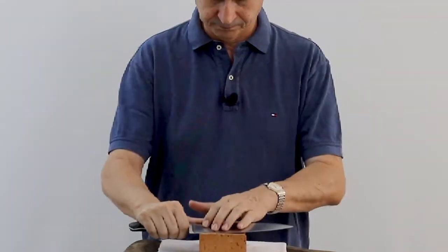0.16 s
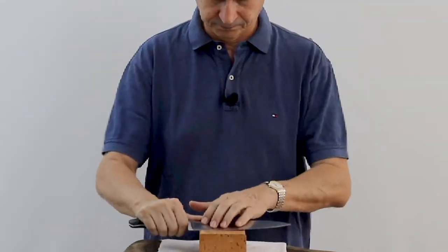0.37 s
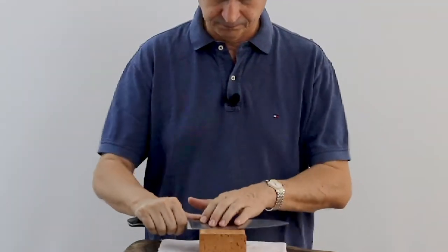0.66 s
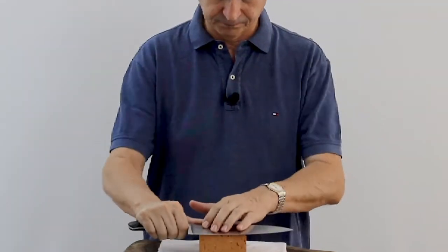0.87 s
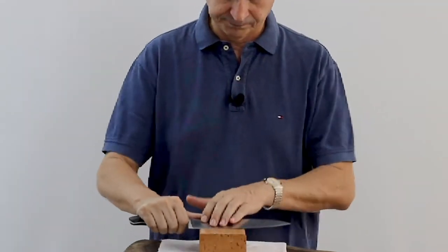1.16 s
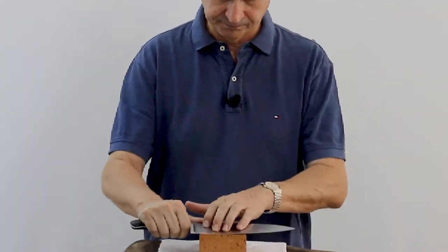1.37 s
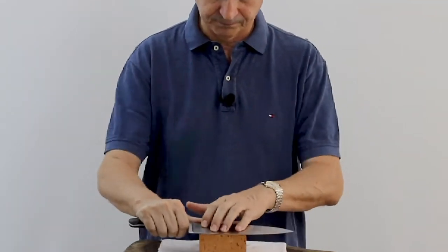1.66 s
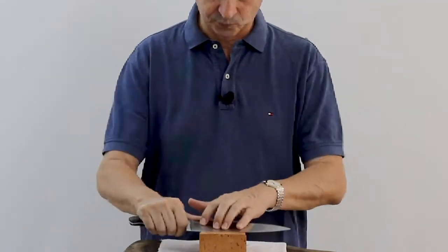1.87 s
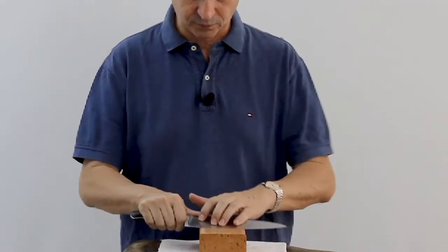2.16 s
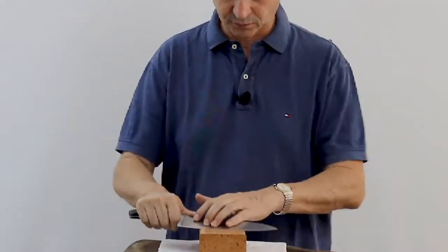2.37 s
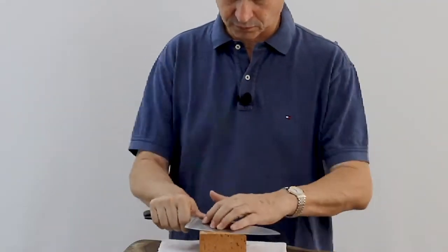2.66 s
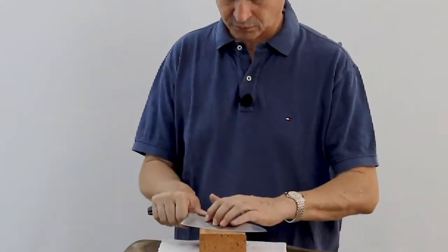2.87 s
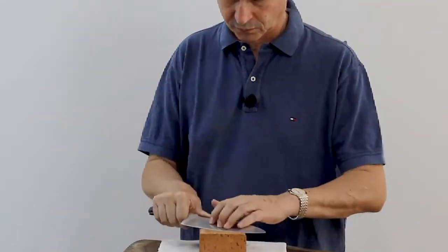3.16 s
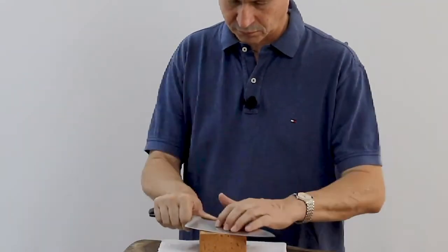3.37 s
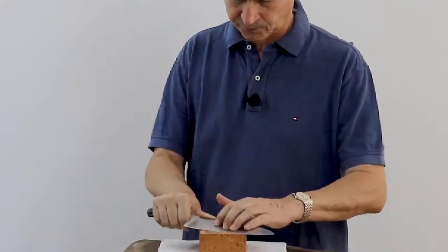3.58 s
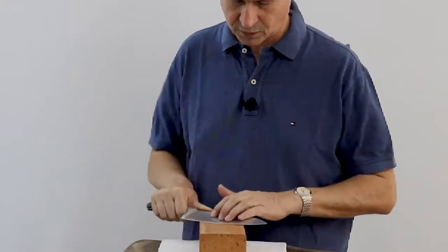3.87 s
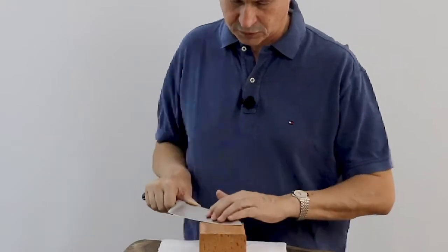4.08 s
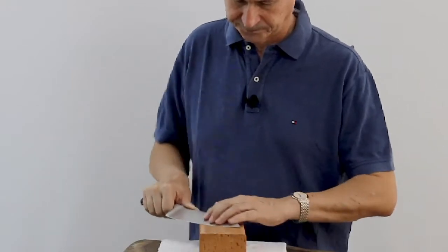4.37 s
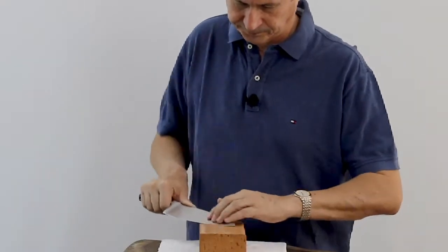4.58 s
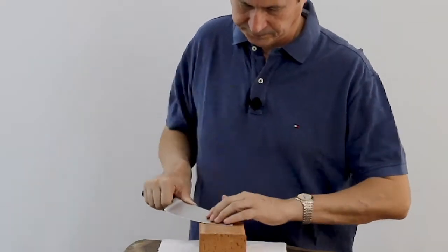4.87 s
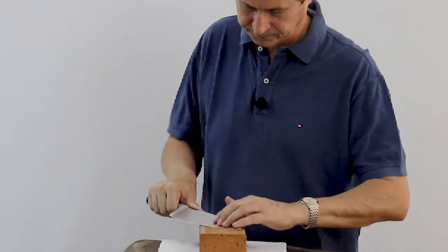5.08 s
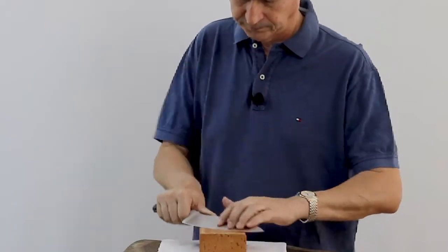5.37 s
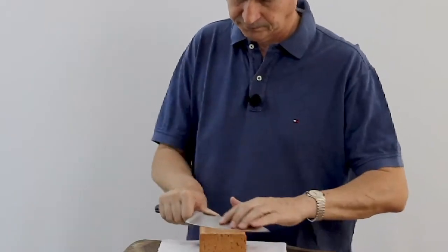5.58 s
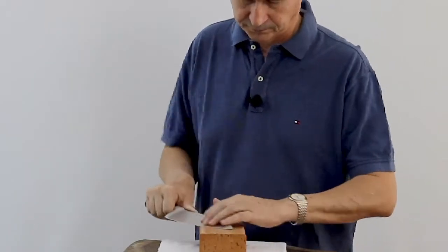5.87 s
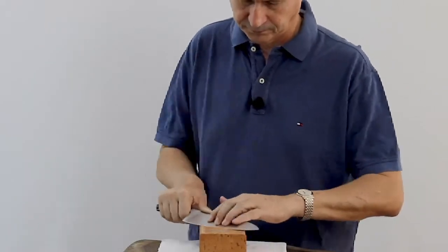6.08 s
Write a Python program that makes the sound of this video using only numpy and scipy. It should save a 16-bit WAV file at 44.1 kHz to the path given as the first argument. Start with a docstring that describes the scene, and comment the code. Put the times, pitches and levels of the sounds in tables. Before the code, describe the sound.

Five heavy, gritty steel scrapes on brick with sharp crackling snaps, then a fluttering rush of fast, softer rasping strokes with a few tiny squeaks.

```python
"""Knife on a wet brick

A steel knife is sharpened on a wet clay brick in a small room, heard from close by over faint air noise and hum.
Five slow, heavy strokes drive the blade's resonances with random grit, while larger grains snap as noise bursts.
Then the same work is heard as if sped up: thin, hissy strokes, about twenty-two a second, in which grit noise
follows the blade's speed and its colour shifts with the hold. A few squeaks (gliding sines) and dull knocks
(filtered noise) join in."""
import sys
import numpy as np
from scipy import signal
from scipy.fft import rfft, irfft, next_fast_len
from scipy.io import wavfile
from scipy.ndimage import map_coordinates

SR = 44100
rng = np.random.default_rng(int(sys.argv[2]) if len(sys.argv) > 2 else 0)


def wav_out(sig):
    """Save sig, one row per channel (or a flat mono array), as 16-bit PCM at SR to the path in sys.argv[1]."""
    wavfile.write(sys.argv[1], SR, np.round(np.clip(np.atleast_2d(sig).T, -1, 1) * 32767).astype(np.int16))


N = 275184
TIME = np.arange(N) / SR
TOP_HZ = 15820  # upper band limit


def amp(db):
    """Level: decibels converted to an amplitude ratio."""
    return 10 ** (np.asarray(db) / 20)


def unit(x):
    """Normalisation: a signal scaled to an rms of 1."""
    return x / np.sqrt(np.mean(x ** 2) + 1e-20)


def add(track, s, sound):
    """Superposition: a sound is summed into a track from time s."""
    start = max(round(s * SR), 0)
    part = track[start:start + len(sound)]
    part += sound[:len(part)]


def wobble(rate, n):
    """Band-limited fluctuation: n samples of a smooth random curve, rate knots a second."""
    knots = rng.standard_normal(n // 8 + 4)
    return map_coordinates(knots, [np.arange(n) * rate / SR], mode="wrap")


def below(hz, edge_hz, order):
    """Low-pass response: gain falls smoothly above the edge."""
    return 1 / np.sqrt(1 + (hz / edge_hz) ** (2 * order))


def above(hz, edge_hz, order):
    """High-pass response: gain falls smoothly below the edge."""
    return below(edge_hz, hz + 1, order)  # + 1 avoids dividing by zero


def coloured(x, gain):
    """Minimum-phase filtering: a given gain over frequency, with ringing only after each grain strikes."""
    size = 2 * next_fast_len(len(x) // 2 + 2048)
    gains = np.maximum(gain(np.fft.rfftfreq(size, 1 / SR)), 1e-6)
    # folding the cepstrum onto positive time makes the filter causal
    cepstrum = irfft(np.log(gains))
    cepstrum[1:size // 2] *= 2
    cepstrum[size // 2 + 1:] = 0
    return irfft(rfft(x, size) * np.exp(rfft(cepstrum)))[:len(x)]


def blade(modes, hz):
    """Modal resonance: summed power of damped peaks; each is 6 dB down one width from its centre."""
    power = 0
    for centre_hz, width_hz, db in modes:
        power = power + (amp(db) / (1 + ((hz - centre_hz) / width_hz) ** 2)) ** 2
    return np.sqrt(power)


def grit(n, size_db, slip_rate, slip_db, slip_t60, rub):
    """Stick-slip friction: unequal grains rub steadily, and slips start at once and die away."""
    grains = rng.standard_normal(n) * amp(size_db * rng.standard_normal(n).clip(-2, 2))
    slips = rng.random(n) < slip_rate / SR
    slip_powers = slips * amp(2 * slip_db * rng.standard_normal(n).clip(-2, 2))
    # slips act on power, so 60 dB of decay is a factor of 1e-6
    power = signal.lfilter([1], [1, -amp(-120 / (slip_t60 * SR))], slip_powers)
    return grains * np.sqrt(rub + power / (power.mean() + 1e-12))


def ringing(x, t60, wet_db):
    """Diffuse decay: a short dense tail of fine steel modes and nearby surfaces."""
    t = np.arange(SR // 4) / SR
    tail = rng.standard_normal(len(t)) * amp(-60 * t / t60)
    return x + amp(wet_db) * signal.fftconvolve(x, tail / np.linalg.norm(tail))[:len(x)]


# Relative spectrum of the background air: frequency_hz, level_db
ROOM_NOISE = [(15, -53), (25, -29), (135, -7.5), (238, 0), (1200, -7), (1560, -28), (2640, -120)]
# Hum components, each sounding at 3 dB above its listed level in rms: pitch_hz, level_db
HUM = [(247.6, -82), (360.7, -85.5), (742.9, -83)]
AIR_DB = -73  # rms


def room():
    """Stationary noise: steady coloured air and a thin hum of phase-wandering sines."""
    points_hz, points_db = np.transpose(ROOM_NOISE)
    air_gain = lambda hz: amp(np.interp(np.log(hz + 1), np.log(points_hz), points_db))
    air = amp(AIR_DB) * unit(coloured(rng.standard_normal(N), air_gain))
    hum = 0
    for hz, db in HUM:
        hum = hum + amp(db + 3) * unit(np.sin(2 * np.pi * hz * TIME + 1.3 * wobble(11, N)))
    return air + hum


# Blade resonances under heavy pressure, in three sets that shift with the grip from stroke to stroke:
# centre_hz, width_hz, level_db
FIRST_GRIP = [(455, 88, -7.5), (772, 34, -10), (1160, 40, -10.5), (1425, 195, -13), (2170, 79, -13.5),
              (2486, 29, -6), (3030, 100, -5), (3960, 155, -11.5), (5010, 180, -10.5), (6600, 400, -9),
              (7656, 120, 1), (8900, 680, -8.5), (10460, 280, -17), (11600, 270, -16.5), (13740, 370, -14),
              (14120.0, 205, -27), (15700, 1200, -23)]
SECOND_GRIP = [(255, 43, -16.5), (439, 70, -8.5), (798, 115, -17), (1184, 63, -10), (1557, 84, -12),
               (2181, 17, -8.5), (2430, 700, -21.5), (3170, 81, -5), (3972, 50, -3), (5110, 530, -12.5),
               (6210, 85, -4.5), (6560, 120.0, -2), (7510, 210, 0.5), (8620, 225, 0), (9710, 210, -8),
               (11100, 280, -10), (12600, 230, -14), (14000, 1500, -14)]
THIRD_GRIP = [(406, 111, -8.5), (806, 38, -6.5), (1200, 250, -18.5), (1605, 68, -3.5), (2626, 170, -3.5),
              (3186, 150, -4), (4030, 300, -14.5), (4870, 110, -5.5), (5190, 110, -6.5), (6390, 480, -8.5),
              (7640, 390, -7), (8700, 540, -8.5), (10170, 220, -14.5), (11350, 610, -18), (12860, 240, -8.5),
              (14100, 910, -13.5)]
# Slow strokes, the last two being relative changes of effort before and after the hardest moment:
# start_s, hardest_s, end_s, growl_db, rasp_db, swell_db, fade_db
GRINDS = [(0.0, 0.043, 0.24, -23, -20.5, -1, 8), (0.291, 0.485, 0.585, -25.5, -20, 8, 14),
          (0.592, 0.651, 0.76, -23, -19.5, 14.5, 8.5), (0.764, 0.801, 0.875, -24.5, -26, 2, 15.5),
          (0.923, 1.055, 1.081, -20, -19, 11.5, 6.5)]
# Resonance set sounding in each slow stroke: modes
GRIND_GRIPS = [FIRST_GRIP, SECOND_GRIP, SECOND_GRIP, THIRD_GRIP, THIRD_GRIP]
# Least effort while the blade still drags between strokes, relative to the hardest moment
DRAG_DB = -16.5


def grinding():
    """Friction-driven resonance: coarse grit excites low modes (growl) and high modes (rasp)."""
    out, t = np.zeros(N), TIME[:SR * 3 // 2]
    turns = [row[0] for row in GRINDS[1:]] + [RUNS[0][0]]
    for stroke, modes, turn in zip(GRINDS, GRIND_GRIPS, turns):
        start, hardest, end, growl_db, rasp_db, swell_db, fade_db = stroke
        force = grit(len(t), size_db=7.5, slip_rate=380, slip_db=-1.0, slip_t60=0.014, rub=1.0)
        steel_gain = lambda hz: blade(modes, hz) * (1.05 - below(hz, 166, order=4))
        steel = coloured(ringing(force, t60=0.06, wet_db=-2.5), steel_gain)
        growl = unit(coloured(steel, lambda hz: below(hz, 3740, order=8)))
        # fine grit comes and goes under the edge
        rasp = coloured(steel, lambda hz: above(hz, 4500, order=8))
        rasp = unit(rasp * amp(1.85 * wobble(90.9, len(t))))
        # the edge bites at once and stays on the brick until the next stroke takes over
        bite = np.clip((t - start) / 0.0023 + 1, 0, 1)
        contact = bite * amp(-60 * np.maximum(t - turn, 0) / 0.044)
        # the arm leans in and eases off; after the stroke only a light drag is left
        effort_db = np.interp(t, [start, hardest, end], [-swell_db, 0, -fade_db])
        effort_db = np.maximum(effort_db - 60 * np.maximum(t - end, 0) / 0.091, DRAG_DB)
        # the arm's push shakes the table faintly, most at the start
        shake = coloured(rng.standard_normal(len(t)), lambda hz: below(hz, 89, order=2))
        rumble = amp(-29.5 - 8.4 * t) * unit(shake)
        # the growl follows the effort slightly more steeply than the rasp
        low = amp(growl_db + 1.094 * effort_db) * (growl + rumble)
        high = amp(rasp_db + 1.06 * effort_db) * rasp
        add(out, 0, contact * (low + high))
    return out


# Large grains that break under the edge: start_s, peak_db
SNAPS = [(0.081, -11), (0.148, -14), (0.4393, -3.5), (0.4813, -7), (0.548, -10), (0.6514, -11.5),
         (0.7685, -6.5), (0.7794, -17), (0.8003, -30), (1.0345, -6.5), (1.0865, -7), (1.103, -9)]


def snaps():
    """Impulsive excitation: a large grain cracks and crumbles within milliseconds, striking the blade."""
    out, t = np.zeros(N), TIME[:SR // 10]
    for s, db in SNAPS:
        decay = amp(-60 * t / 0.0035) + amp(-11.0 - 60 * t / 0.013)  # crack, then crumble
        crack = rng.standard_normal(len(t)) * decay
        modes = SECOND_GRIP if s < GRINDS[3][0] else THIRD_GRIP
        snap_gain = lambda hz: blade(modes, hz) * above(hz, 870, order=1)
        snap = coloured(ringing(crack, t60=0.065, wet_db=2), snap_gain)
        add(out, s, amp(db) * snap / np.abs(snap).max())
    return out


# Runs of evenly spaced quick strokes: start_s, strokes_count
RUNS = [(1.118, 7), (1.426, 4), (1.62, 4), (1.788, 5), (2.056, 4), (2.268, 7), (2.616, 4), (2.823, 9),
        (3.246, 7), (3.603, 8), (3.988, 8), (4.354, 18), (5.113, 14), (5.691, 6), (5.928, 8)]
RUNS_END_S = 6.232
# Pressure on the blade, heard as the level of the quick strokes: time_s, level_db
PRESSURE = [(1.14, -34), (1.29, -35.5), (1.45, -33), (1.75, -38), (2.08, -34), (2.19, -36), (2.55, -35),
            (2.79, -41), (2.9, -45), (2.98, -38.5), (3.2, -37), (3.35, -34), (3.75, -33.5), (3.98, -32.5),
            (4.2, -39.5), (4.54, -41.5), (4.9, -37.5), (5.12, -38), (5.37, -35.5), (5.47, -36.5),
            (5.68, -37.5), (5.9, -45), (6.21, -36.5)]
# Relative weight of the low modes (body) and high modes (sizzle): time_s, body_db, sizzle_db
SCRUB_TONE = [(1.14, 2, -1), (1.9, 1.5, 0), (2.25, 0, -1), (2.6, -1.5, 0.5), (2.86, 5, 1.5),
              (3.04, -8.5, -3), (3.55, 3.5, 0.5), (3.7, -2.5, -2.5), (3.92, 2.5, 4), (4.02, -8, -4),
              (4.2, 2, -2), (4.72, 0, -3.5), (5.25, -0.5, -1), (5.5, -1, 0.5), (5.87, 2, -4),
              (6.17, 1.5, 0.5)]
# Single quick strokes that stand out as stronger, weaker, fuller or thinner:
# time_s, extra_level_db, extra_body_db
ACCENTS = [(2.135, 2.5, 0), (2.44, -0.5, 3), (2.49, 1, -1), (2.64, 2, -2.5), (2.985, 0.5, 3.5),
           (3.175, -2.5, 10.5), (4.2, -3.5, 0), (4.415, 2.5, -1), (4.67, 4, 1.5), (4.925, 2.5, 0),
           (5.3, -2, -1), (5.42, 1.5, 0), (5.46, -3.5, 4.5), (5.67, 3, 0), (5.985, 5.5, -0.5),
           (6.025, -2.5, -2), (6.06, 3.5, 7.5), (6.1, -2, 6), (6.21, 1.5, 3.5)]
# The push starts early, louder and fuller; the pull starts late, softer and thinner, by the same amounts
PUSH_LEAD_S, PUSH_DB, PUSH_BODY_DB = 0.0008, 0.48, 1
# Fastest moment as a share of the stroke, 0-1
PUSH_FASTEST, PULL_FASTEST = 0.38, 0.52
# Standard deviations from stroke to stroke
SCATTER_DB, TONE_SCATTER_DB = 0.6, 0.24


def quick_strokes():
    """Reciprocating motion: yields start s, end s, fastest share, level, body and sizzle dB per stroke."""
    run_s, counts = np.transpose(RUNS)
    number = np.arange(counts.sum() + 1)
    way = (-1) ** number  # +1 push, -1 pull
    first_numbers = np.r_[0, np.cumsum(counts)]
    turns = np.interp(number, first_numbers, np.r_[run_s, RUNS_END_S]) - PUSH_LEAD_S * way
    tone_s, body_curve, sizzle_curve = np.transpose(SCRUB_TONE)
    for start, end, sign in zip(turns, turns[1:], way):
        middle = (start + end) / 2
        db = np.interp(middle, *np.transpose(PRESSURE)) + sign * PUSH_DB
        db += rng.normal() * SCATTER_DB
        body_db = np.interp(middle, tone_s, body_curve) + sign * PUSH_BODY_DB
        body_db -= rng.normal() * TONE_SCATTER_DB
        sizzle_db = np.interp(middle, tone_s, sizzle_curve) - rng.normal() * TONE_SCATTER_DB
        for s, extra_db, extra_body_db in ACCENTS:
            if start <= s < end:
                db, body_db = db + extra_db, body_db + extra_body_db
        yield start, end, PUSH_FASTEST if sign > 0 else PULL_FASTEST, db, body_db, sizzle_db


# Blade resonances in the quick strokes, for each way of holding it: centre_hz, width_hz, level_db
FLAT = [(1690, 140, -17.5), (2560, 555, -2), (4820, 310, 1), (6950, 610, -7), (9840, 470, 8),
        (12800, 690.0, -9)]
PRESSED = [(1700, 195, -17), (2710, 400, -9), (5090, 370, -4.5), (5870, 180, -6), (6920, 300, -7.5),
           (10790, 1010, -1.5)]
TURNED = [(1605, 290, -22.5), (2660, 300, -18), (5210, 450, -11), (5770, 170, -7), (7000, 630, -17),
          (10140, 770, -14.5), (13400, 1400, -21.5)]
TILTED = [(1510, 290, -16.5), (2720, 400, -20), (6270, 930, -9), (6600, 140, 1), (8970, 370, -10.5),
          (10400, 670.0, -12.5), (13100, 790.0, -13.5)]
BELLY = [(1580, 223, -12.5), (2880, 386, -9), (4810, 450, -13), (5840, 430, 2.6), (6670, 270, -1.5),
         (9400, 2300, -14), (10000, 170, -14), (12600, 280, -9)]
TIP = [(1770, 216, -3), (2940, 910, -10.5), (5390, 810, -1.5), (7480, 730, -3), (9000, 290, -6),
       (10570, 1100, -5.5), (13400, 1100, -1)]
ROLLED = [(2260, 340, -9.5), (4780, 540, -11), (5800, 350, -4), (6600, 510, -2), (7660, 230, -1),
          (9640, 860, -2.5), (13100, 1300, -10)]
POINT = [(1830, 370, 2), (2900, 73, -17), (4400, 340, -7), (5340, 310, -0.5), (7700, 330, 6.5),
         (11700, 2500, 5.5)]
# The two highest resonances, whose pitch is the same in every hold: centre_hz, width_hz, level_db
TOP_MODES = [(14700, 62, 3.5), (15250, 290, 1.5)]
# Changes of hold, with the depth of the blade's antiresonance: time_s, modes, notch_db, top_modes_db
HOLDS = [(1.05, FLAT, 4, 6.5), (1.52, PRESSED, 11, -0.5), (2.28, TURNED, 0.5, -7.5),
         (2.9, TILTED, 10, -8.5), (3.25, BELLY, 17, -1.5), (4.08, TIP, 10, 6), (5.23, ROLLED, 18, -5),
         (5.39, BELLY, 14.5, 1.5), (5.692, POINT, 9, -2), (5.964, BELLY, 24, 3.5)]


def hold_colour(s, hz, roll_s):
    """Boundary-dependent modes: gain at time s as the wrist rolls smoothly from one hold to the next."""
    reached = [np.clip((s - hold[0]) / roll_s + .5, 0, 1) for hold in HOLDS[1:]]
    shares = -np.diff([1] + reached + [0])
    gain = 0
    for (_, modes, notch_db, top_db), share in zip(HOLDS, shares):
        if share > 0:
            hollow_db = -notch_db * np.exp(-((hz - 3330) / 350) ** 2)
            steel = np.hypot(blade(modes, hz), amp(top_db) * blade(TOP_MODES, hz))
            gain = gain + share * steel * amp(hollow_db)
    return gain * (above(hz, 1260, order=5) + 0.39)


def scrubbing():
    """Velocity-dependent friction: the rasp swells with the blade's speed and almost stops at every turn."""
    out, t = np.zeros(N), TIME[:SR // 12]
    for s, end, fastest, db, body_db, sizzle_db in quick_strokes():
        travel = t / (end - s)
        speed = np.sin(np.pi * np.interp(travel, [0, fastest, 1], [0, .5, 1]))
        # the force follows speed more steeply while slowing than while speeding up
        steepness = np.where(travel < fastest, 0.95, 1.4)
        push = np.hypot(np.abs(speed) ** steepness, .1) * (travel < 1)
        # just after the turn it skims for a moment before it grips
        grip = np.clip((travel - 0.135 - 0.027 * rng.normal()) / 0.023, 0, 1)
        push = np.maximum(push * amp(-4.5 * (1.5 - grip)), .1) * (travel < 1)
        # no two strokes touch the brick at quite the same place
        detune = 1 + 0.0064 * rng.standard_normal()
        ripple_db = 1.23 * rng.standard_normal(size=32)
        ripple_hz = np.linspace(0, TOP_HZ, len(ripple_db))
        ripple = lambda hz: amp(np.interp(hz, ripple_hz, ripple_db))
        steel = lambda hz: hold_colour((s + end) / 2, hz * detune, roll_s=0.068) * ripple(hz)
        # coarse grit rasps in the lower modes, fine grit sizzles in the upper ones
        body = lambda hz: amp(body_db * below(hz, 3400, order=9))
        coarse = lambda hz: steel(hz) * below(hz, 8300, order=12) * body(hz)
        fine = lambda hz: steel(hz) * above(hz, 8300, order=12) * amp(sizzle_db)
        rasp = 0
        for colour in (coarse, fine):
            grains = grit(len(t), size_db=1.0, slip_rate=450, slip_db=3.5, slip_t60=0.006, rub=0.58)
            rasp = rasp + coloured(ringing(push * grains, t60=0.045, wet_db=-2.5), colour)
        # the level refers to the stroke's length rather than the whole buffer; -0.07 dB is a trim
        add(out, s, amp(db - 0.07) * unit(rasp) / np.sqrt(travel[-1]))
    return out


# Knocks as the brick rocks on its table: start_s, peak_db, pitch_hz
BUMPS = [(1.399, -63, 140), (2.565, -57.5, 332), (3.787, -54, 161), (4.558, -57, 338), (5.2, -60, 230),
         (5.769, -55, 328), (5.949, -60, 183)]


def bumps():
    """Damped impact: decaying noise through one broad resonance gives the brick's dull knock on the table."""
    out, t = np.zeros(N), TIME[:SR // 5]
    for s, db, hz in BUMPS:
        push = rng.standard_normal(len(t)) * amp(-60 * t / 0.16)
        knock = coloured(push, lambda f: blade([(hz, 110, 0)], f) * above(f, 115, order=2))
        add(out, s, amp(db) * knock / np.abs(knock).max())
    return out


# Catches of the edge, loudest 0.01 s after the time given, near 1.025 times the pitch
# and around 9 dB under the level: time_s, level_db, pitch_hz
CHIRPS = [(1.818, -23.5, 11100), (1.9635, -18.5, 10600), (2.0218, -20, 10900), (2.127, -15, 11000),
          (2.243, -22.5, 11300), (3.925, -21, 10700)]


def chirps():
    """Self-excited oscillation: the edge catches and one high mode swells into a rough, rising squeak."""
    out, t = np.zeros(N), TIME[:SR // 20] - .02
    for s, db, hz in CHIRPS:
        pitch = hz * (1.025 + 2.2 * t + .03 * wobble(900, len(t)))
        swell = np.exp(-(t / .008) ** 2) * amp(3 * wobble(700, len(t)))
        squeak = np.sin(2 * np.pi * np.cumsum(pitch) / SR)
        add(out, s - .01, amp(db - 9) * swell * squeak)
    return out


def scene():
    """Linear superposition: all sources summed in mono, heard from close by."""
    return (grinding() + snaps() + scrubbing() + chirps() + bumps() + room())[None]


def record(dry):
    """Band limitation: a very steep low-pass removes what lies above the band limit."""
    size = next_fast_len(N + SR // 2)
    band = below(np.fft.rfftfreq(size, 1 / SR), TOP_HZ, order=500)
    return irfft(rfft(dry, size) * band, size)[..., :N]


dry = scene()
out = record(dry)
wav_out(out)
```